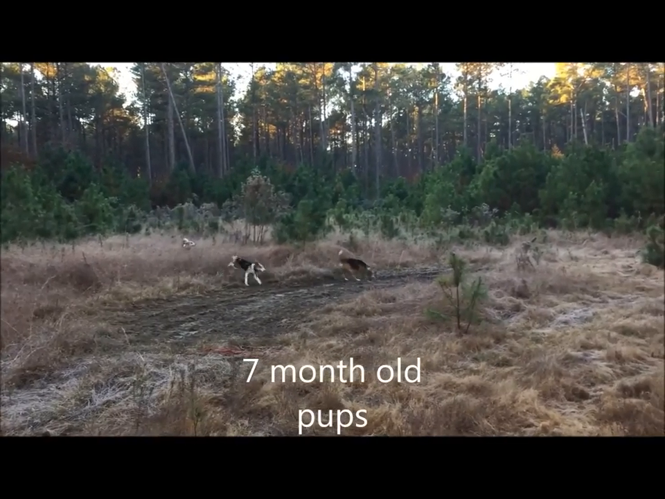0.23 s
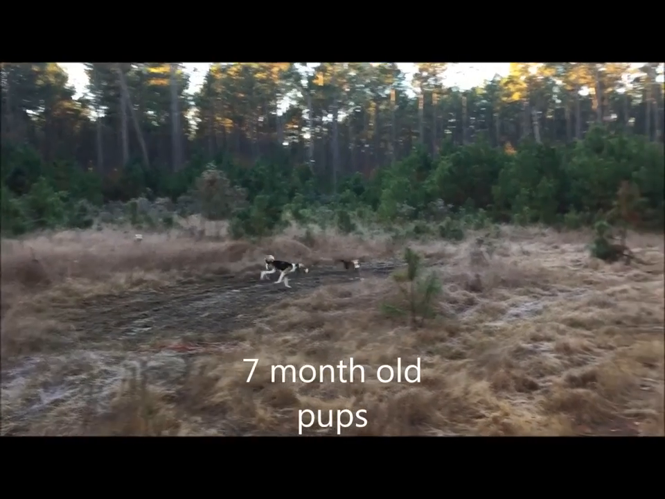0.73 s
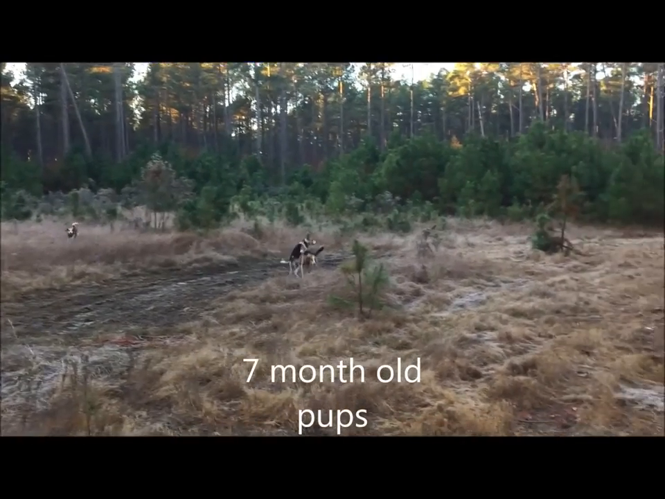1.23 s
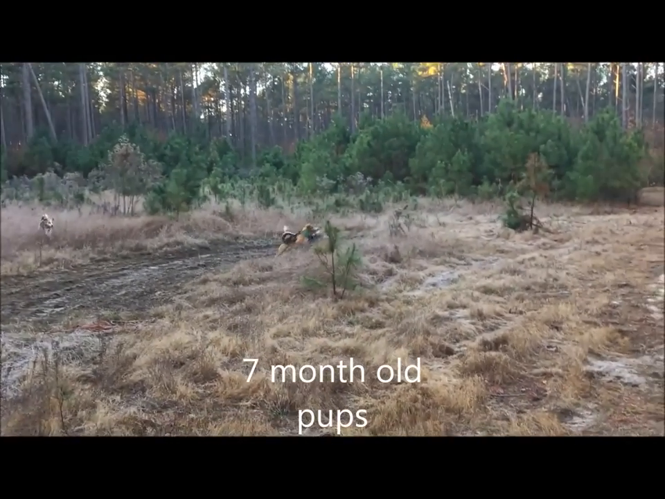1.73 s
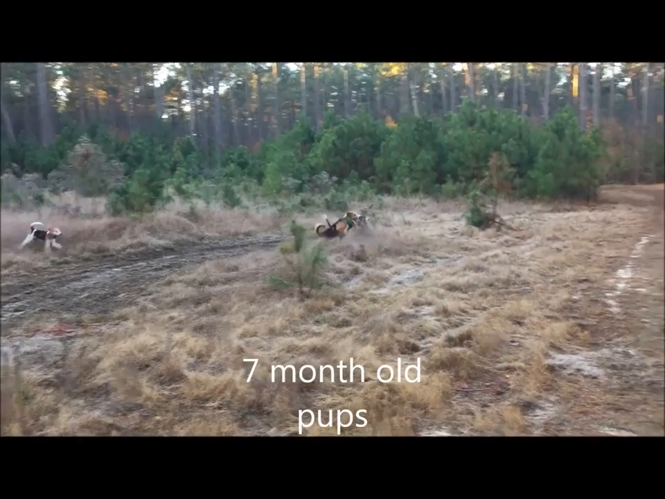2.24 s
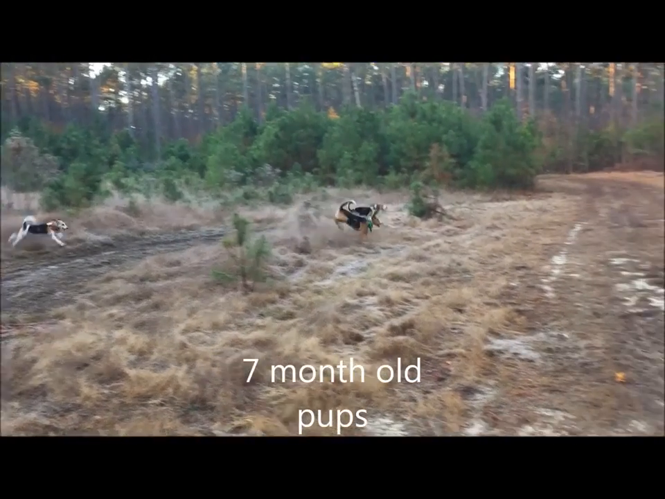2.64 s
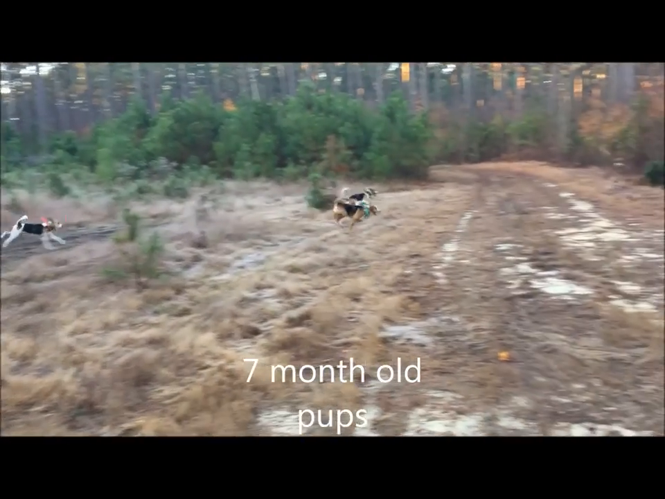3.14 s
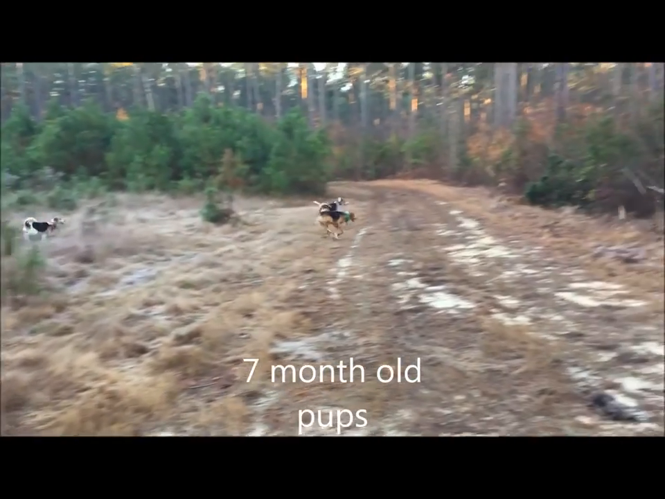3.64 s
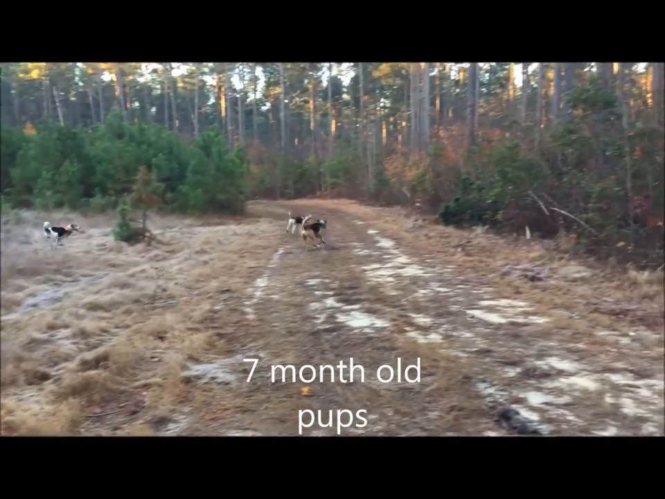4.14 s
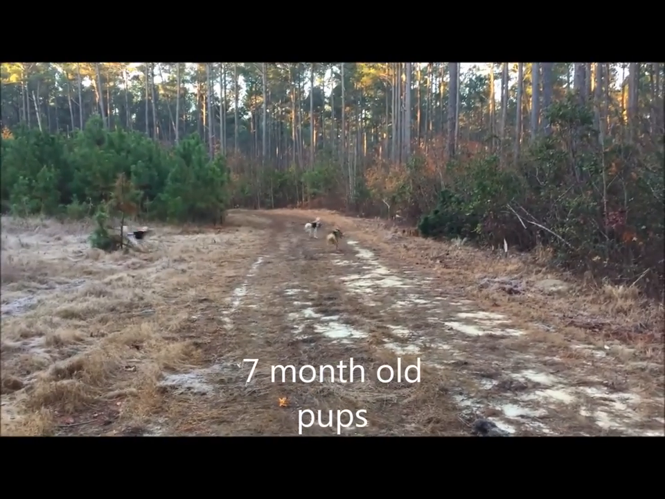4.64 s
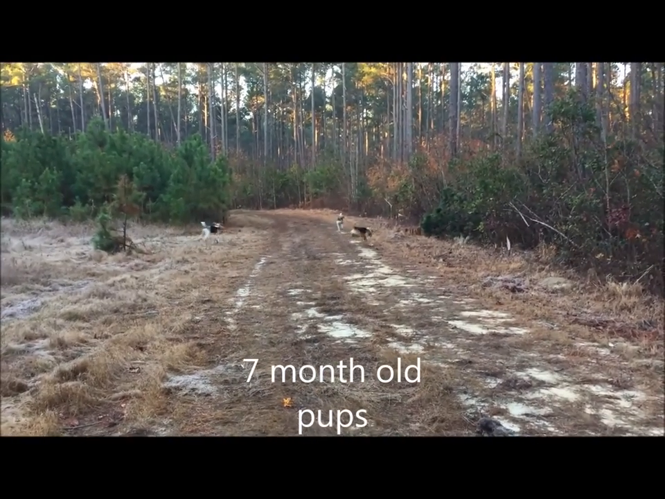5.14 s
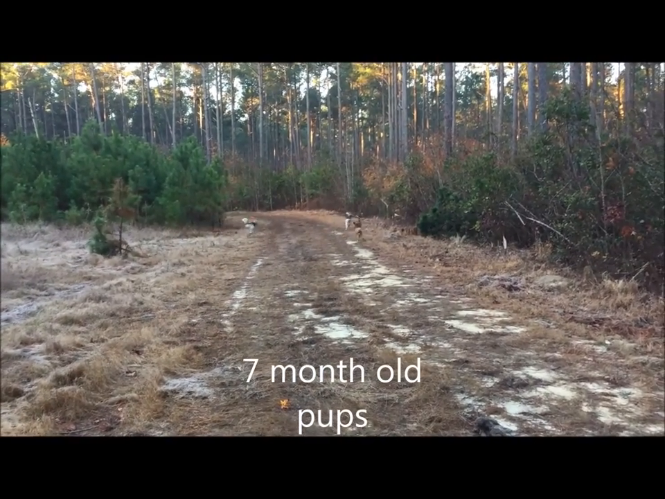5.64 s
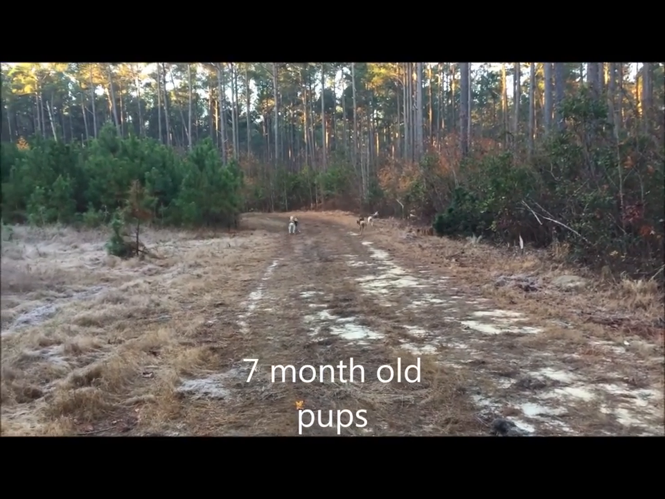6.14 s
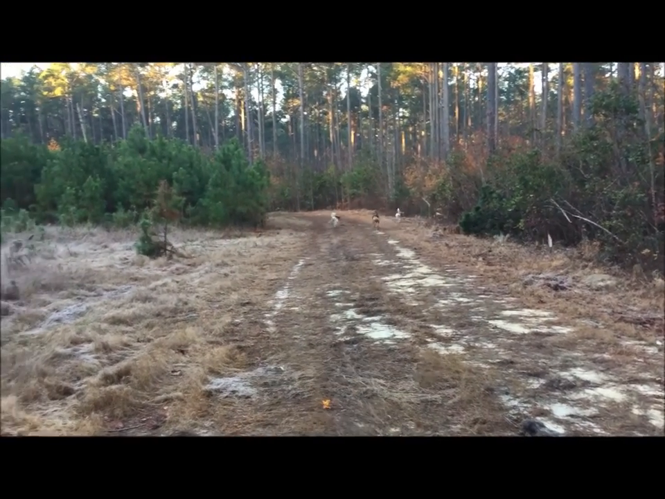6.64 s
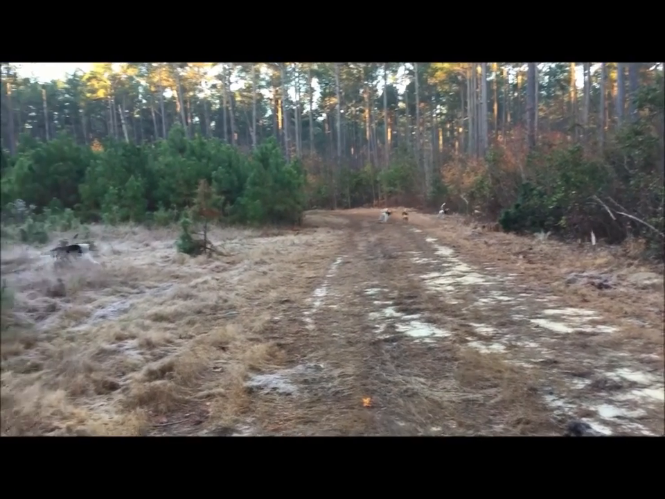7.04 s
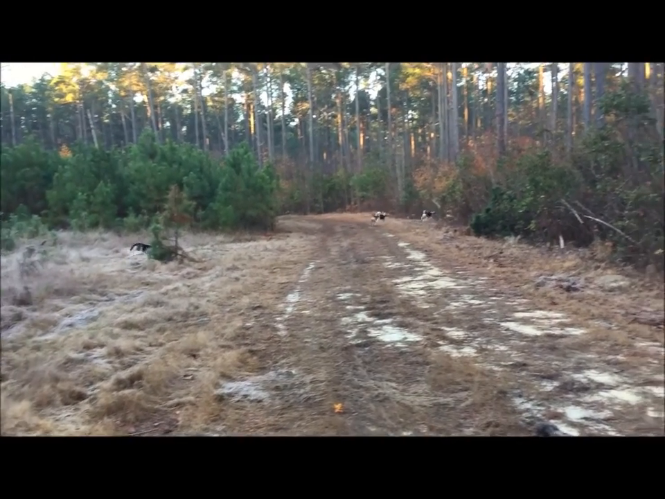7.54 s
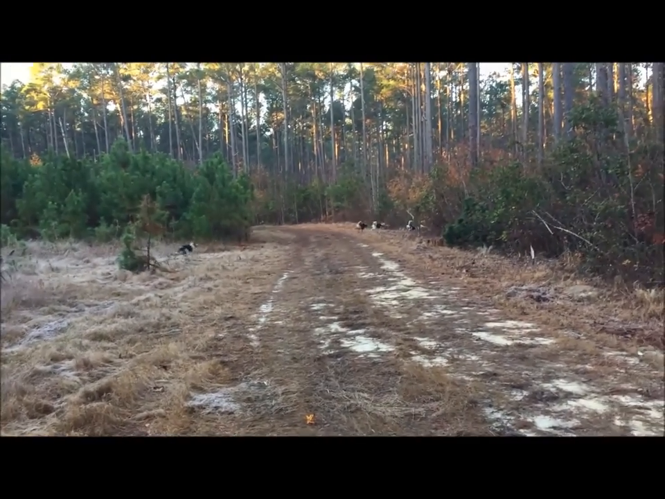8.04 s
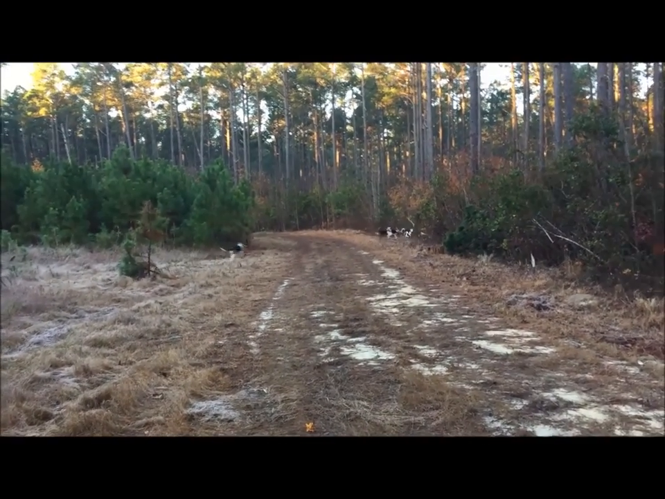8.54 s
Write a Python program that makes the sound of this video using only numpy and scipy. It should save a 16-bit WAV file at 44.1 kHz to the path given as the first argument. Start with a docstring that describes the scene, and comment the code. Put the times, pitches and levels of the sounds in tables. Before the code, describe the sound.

A microphone in the open picks up a pack of running hounds at some distance. Four separate yelps come first, with thin high whistles and a crisp twig crack close by. Their echo hangs through a pause, then calls resume, crowding into a cracked, raspy chorus in the middle before easing to regular single yelps with low rough growls. Quiet low rumble, soft air and dry grass lie underneath.

```python
"""High arched yelps that crack and turn hoarse: young hounds bay as they run a trail through pine woods.
The trunks throw back a long ringing tail. Between the bays: thin whistles, twig snaps, dry grass, a low rumble.
Voices are wavering tones with overtones, roughened and mixed with breath noise; whistles are gliding sines.
Snaps, grass, air and drone are shaped noise; bushes and trees answer by convolution with decaying noise."""
import sys
import numpy as np
from scipy import signal
from scipy.fft import rfft, irfft
from scipy.io import wavfile
from scipy.ndimage import uniform_filter1d

SR = 44100
rng = np.random.default_rng(int(sys.argv[2]) if len(sys.argv) > 2 else 0)


def wrap_up_sound(samples):
    """Save the sound to the file named by the first command line argument, as 16-bit audio."""
    columns = np.atleast_2d(samples).T
    # keep every value between -1 and 1, then stretch to whole-number steps
    tamed = np.clip(columns, -1, 1)
    steps = np.round(tamed * 32767).astype(np.int16)
    wavfile.write(sys.argv[1], SR, steps)


N = 387198
TIME = np.arange(N) / SR


def from_db(db):
    """Decibels to gain."""
    return 10 ** (np.asarray(db) / 20)


def rms_one(x):
    """Scale to unit power."""
    return x / np.sqrt(np.mean(x ** 2) + 1e-20)


def at_hz(points, hz):
    """Read a spectrum on a log-frequency axis."""
    f, value = np.transpose(points)
    return np.interp(np.log(np.maximum(hz, 1)), np.log(f), value)


def coloured(spectrum, size):
    """Noise of a given spectrum, rms 1."""
    hz = np.arange(size // 2 + 1) * SR / size
    white = rfft(rng.standard_normal(size))
    return rms_one(irfft(white * from_db(at_hz(spectrum, hz)), size))


def wobble(rate_hz, size):
    """Smooth random drift up to rate_hz, about unit rms."""
    run_in = SR // 8
    lowpass = signal.butter(4, rate_hz, fs=SR, output="sos")
    drift = signal.sosfilt(lowpass, rng.standard_normal(size + run_in))
    return rms_one(drift)[run_in:]


def resonance(x, hz, width_hz):
    """Two-pole resonance with gain 1 on top."""
    r = np.exp(-np.pi * width_hz / SR)
    feedback = [1, -2 * r * np.cos(2 * np.pi * hz / SR), r * r]
    return signal.lfilter(np.array([1, 0, -1]) * (1 - r * r) / 2, feedback, x)


def note(start_s, length_s, edge_s):
    """Samples a call covers, their time since its start, and its soft-edged gate."""
    inside = np.minimum(TIME - start_s, start_s + length_s - TIME) / edge_s + .5
    at = np.flatnonzero(inside > 0)
    gate = np.sin(np.pi / 2 * np.minimum(inside[at], 1)) ** 2
    return at, np.clip(TIME[at] - start_s, 0, length_s), gate


# still-air spectrum: (f/Hz, relative level/dB)
AIR = [(25, -21), (50, -3), (80, 6.5), (180, -1), (300, -13.5), (700, -14.5), (2000, -19.5), (5000, -26.5),
       (15500, -38)]


def still_air(level_db=-59.0):
    """Noise falling off toward the treble, its level drifting slightly."""
    return from_db(level_db + 2.2 * wobble(11, N)) * coloured(AIR, N)


def far_drone(level_db=-65):
    """Far wavering drone: noise through two equal low resonances."""
    hum = rms_one(resonance(resonance(rng.standard_normal(N), 81.6, 21), 81.6, 21))
    return from_db(level_db + 0.95 * wobble(8, N)) * hum


# grass spectrum: (f/Hz, relative level/dB)
GRASS_COLOUR = [(1500, 0), (3000, -3.5), (7000, -3), (10000, -5), (15000, -5)]
# dry grass stirring close by: (middle t/s, half-width t/s, peak level/dB)
RUSTLES = [(0.12, 0.14, -61.5), (0.325, 0.048, -64.5), (1.394, 4, -71), (2.254, 0.36, -64),
           (2.841, 0.24, -71), (4.79, 0.13, -64.5), (5.843, 0.037, -61), (8.173, 0.04, -61.5)]
GRASS_REST_DB = -83   # never quite still


def grass():
    """Crisp noise; bell-shaped rustles add in power over a resting level."""
    power = from_db(GRASS_REST_DB) ** 2
    for s, half_width_s, level_db in RUSTLES:
        power = power + (from_db(level_db) * np.exp(-2 * ((TIME - s) / half_width_s) ** 2)) ** 2
    return np.sqrt(power) * from_db(0.97 * wobble(70, N)) * coloured(GRASS_COLOUR, N)


# twig snaps: (t/s, level/dB, ring f/Hz)
SNAPS = [(0.565, -58, 6000), (1.202, -57, 4990), (1.221, -48, 4730), (1.236, -27, 6080), (1.27, -50, 3470),
         (1.313, -36, 5100), (1.326, -44, 4000), (1.44, -55, 4470), (2.744, -56, 3245)]


def twig(crack_s=0.0024, splinter_db=-24, splinter_s=0.03):
    """Each snap is a very short bright burst with a splintering tail."""
    out, t = np.zeros(N), TIME[:SR // 10]
    envelope = np.exp(-(t / crack_s) ** 2) + from_db(splinter_db) * np.exp(-t / splinter_s)
    for s, level_db, hz in SNAPS:
        burst = rms_one(resonance(rng.standard_normal(len(t)), hz, 1200))
        at = round(s * SR)
        out[at:at + len(t)] += from_db(level_db) * burst * envelope
    return out


# whistles: (t/s, length t/s, first f/Hz, last f/Hz, level/dB); pitches before the warble
WHISTLES = [(0.315, 0.027, 6100, 6400, -62), (0.53, 0.039, 9150, 8450, -65.5),
            (0.58, 0.081, 8600, 8700, -73), (0.7, 0.028, 8850, 8750, -69), (0.595, .18, 4330, 4550, -53.5),
            (1.739, 0.029, 6310, 6700, -55.5), (5.031, 0.018, 9580, 9890, -57),
            (6.124, 0.055, 9200, 9300, -71), (6.483, 0.034, 5800, 5720, -57),
            (6.487, 0.04, 9520, 9540, -75), (6.71, 0.029, 10440, 10100, -72),
            (6.843, 0.024, 9970, 10020, -69.5)]
WARBLE_RATE_HZ, WARBLE_DEPTH_HZ = 7.9, 120


def whistling(octave_db=-40.0):
    """Thin gliding, warbling tones with a faint octave."""
    out = np.zeros(N)
    for s, length_s, first_hz, last_hz, level_db in WHISTLES:
        at, t, gate = note(s, length_s, edge_s=0.012)
        glide_hz = first_hz + (last_hz - first_hz) * t / length_s
        pitch_hz = glide_hz - WARBLE_DEPTH_HZ * np.cos(2 * np.pi * WARBLE_RATE_HZ * t)
        phase = 2 * np.pi * np.cumsum(pitch_hz * (1 + 0.0016 * wobble(150, len(at)))) / SR
        octave = from_db(octave_db) * np.sin(2 * phase) * (pitch_hz < SR / 8)
        out[at] += gate * from_db(level_db) * np.sqrt(2) * (np.sin(phase) + octave)
    return out


# decay of the woods: (f/Hz, 60 dB decay t/s)
WOODS_T60 = [(1300, 5), (1800, 1), (2600, 3), (3800, 0.66), (9000, 3)]


def lingering(level_db=-51):
    """The woods still ring from an earlier bay: resonant noise dying away."""
    ringing = resonance(resonance(rng.standard_normal(N), 1420, 220), 1420, 220)
    return from_db(level_db - 60 * TIME / WOODS_T60[0][1]) * rms_one(ringing)


# colour of the woods' answer: (f/Hz, level/dB)
WOODS_COLOUR = [(400, -18.5), (650, -6.5), (1000, -10), (1300, -7), (1600, -3), (2000, -0.5), (2550, -2.5),
                (3100, -3.5), (4200, -0.5), (7000, -6)]


def woods(x, edge_s=0.024, early_db=4, early_s=0.064, clump_db=2.5, patchy_db=3):
    """Countless trunks scatter the sound: near ones answer strongly, far ones linger; decay varies by band."""
    t = TIME[:3 * SR]
    white, tail = rng.standard_normal((2, len(t))), 0
    edges_hz = 300 * 2 ** (np.arange(12) / 2)
    for k, (low, high) in enumerate(zip(edges_hz, edges_hz[1:])):
        hz = np.sqrt(low * high)
        bandpass = signal.butter(2, [low, high], "band", fs=SR, output="sos")
        band = signal.sosfilt(bandpass, white[k % 2])
        decay_db = -60 * t / at_hz(WOODS_T60, hz)
        tail = tail + band * from_db(at_hz(WOODS_COLOUR, hz) + decay_db + patchy_db * wobble(14, len(t)))
    tail *= from_db(clump_db * wobble(28, len(t)))   # trunks stand in clumps: the answer flutters
    arrival = 1 - np.exp(-(t / edge_s) ** 4)   # sound first crosses the clearing
    tail *= arrival * (1 + from_db(early_db) * np.exp(-t / early_s))
    return signal.fftconvolve(x, tail * np.sqrt(2 / SR))[:N]


def thicket(x, level_db=-11, fade_s=0.02):
    """Ground and bushes beside the dogs scatter each call so soon that it beats with itself."""
    t = TIME[:SR // 5]
    scatter = rng.standard_normal(len(t)) * np.exp(-t / fade_s) * np.sqrt(2 / (fade_s * SR))
    # twigs turn back mainly short waves
    scatter = signal.sosfilt(signal.butter(1, 1500, "high", fs=SR, output="sos"), scatter)
    return from_db(level_db) * signal.fftconvolve(x, scatter)[:N]


# throat colour of overtones 3-8: (f/Hz, level/dB)
THROAT = [(2400, -0.5), (2900, -4.5), (3250, -10), (3700, -16.5), (4350, -20.5), (5000, -29.5),
          (5900, -23.5), (7200, -32), (8600, -33), (10500, -52)]
# rasp of air in the throat: (f/Hz, relative level/dB)
RASP = [(350, -55.5), (600, -26), (1300, 1), (1750, 6.5), (2400, 2), (3000, -20), (3900, -5.5), (4600, -18),
        (6200, -16), (8500, -24.5), (11000, -44.5)]
OVERTONE_ROUGHNESS = 0.3   # added per overtone above the octave
OCTAVE_FLUTTER_DB, OVERTONE_FLUTTER_DB = 3, 4.5   # rms
BLUR_HZ, HOARSE_BLUR_HZ = 100, 313   # hoarser calls spread their lines wider
GRIT_DB, GRIT_HZ = 5.5, 120   # a hoarse voice comes in uneven jolts
GLIDE_DULL_DB_PER_OCTAVE, FAST_GLIDE_OCTAVES_PER_S = 12, 14
SLACK_DULL_DB_PER_OCTAVE = 18.0


def bay(pitch_hz, level_db, octave_db, hoarse, bite_db, waver=0.0068, rasp_db=-14, slack_rasp_db=7):
    """Vocal folds give a near-pure tone with overtones; when hoarse they beat unevenly and air rasps through."""
    size, hoarse = len(pitch_hz), np.clip(hoarse, 0, 1)
    blur_hz = BLUR_HZ + HOARSE_BLUR_HZ * hoarse.max() ** 2
    # the pitch never holds quite still
    phase = 2 * np.pi * np.cumsum(pitch_hz * (1 + waver * wobble(100, size))) / SR

    def partial(k):
        """Uneven cycles spread a line into a rough band of the same power."""
        chaos = np.clip(1.7 * hoarse + OVERTONE_ROUGHNESS * max(k - 2, 0), 0, 1) ** 3.0
        band = wobble(blur_hz, size) * np.cos(k * phase) + wobble(blur_hz, size) * np.sin(k * phase)
        slip = 0.079 * (k - 1) * wobble(75, size)   # higher overtones are less steady
        return np.sqrt(2 - 2 * chaos ** 2) * np.sin(k * phase + slip) + chaos * band

    voice = from_db(level_db) * partial(1)
    voice += from_db(octave_db + OCTAVE_FLUTTER_DB * wobble(42, size)) * partial(2)

    slack = np.clip(2 - pitch_hz / 620, 0, 1)   # slack folds give few overtones
    speed = uniform_filter1d(np.gradient(np.log2(pitch_hz)) * SR, size=400)   # octaves/s
    sliding = np.minimum(np.abs(speed) / FAST_GLIDE_OCTAVES_PER_S, 1)   # fast slides dull the top
    dulling_db = SLACK_DULL_DB_PER_OCTAVE * slack + GLIDE_DULL_DB_PER_OCTAVE * sliding
    for k in range(3, 9):
        overtone_db = octave_db + bite_db + at_hz(THROAT, k * pitch_hz) - dulling_db * np.log2(k / 2)
        voice += from_db(overtone_db + OVERTONE_FLUTTER_DB * wobble(40, size)) * partial(k)

    # on low notes strong and weak cycles alternate: a growl with lines between the harmonics
    for k in (0.5, 1.5, 2.5):
        half_db = level_db + at_hz(RASP, k * pitch_hz) / 2 - 5 * np.log2(2 * k)
        voice += from_db(half_db) * hoarse * np.minimum(2 * slack, 1) * partial(k)

    # slack folds leak more air
    breath = from_db(rasp_db + slack_rasp_db * slack) * hoarse
    breath = breath * (from_db(octave_db) + hoarse * from_db(level_db))
    rasp = breath * coloured(RASP, size) * (1 + .5 * np.sin(phase))
    jolts = from_db(GRIT_DB * hoarse * (wobble(GRIT_HZ, size) - .5 * hoarse))
    return jolts * (voice + rasp)


# short low growls: (t/s, length t/s, f/Hz, level/dB, octave re fundamental level/dB, hoarseness 0-1)
GROWLS = [(0.138, 0.057, 768.6, -52.5, -2.5, 0.43), (6.203, 0.22, 726, -50.5, -3, 0.42),
          (6.597, 0.072, 490.5, -45.5, -3, 0.38), (6.981, 0.062, 704, -42.5, -31, 0.48),
          (7.422, 0.074, 567.6, -48.5, -12, 0.43), (7.809, 0.064, 561.3, -42.5, -15.5, 0.41),
          (8.616, 0.04, 654, -47.5, -15, 0.44)]
GROWL_BITE_DB, GROWL_CARRY_DB = 7, 8


def growl(row):
    """The same voice held low and rough, with soft edges."""
    s, length_s, hz, level_db, overtone_db, hoarse = row
    at, t, gate = note(s, length_s, edge_s=0.012)
    pitch_hz = np.full(len(t), float(hz))
    sound = bay(pitch_hz, level_db, level_db + overtone_db, hoarse, GROWL_BITE_DB)
    return at, gate * sound, GROWL_CARRY_DB


# open mouth colours the octave overtone as it glides through: (f/Hz, level/dB)
MOUTH = [(1000, -5), (1270, -5), (1600, -5), (2000, -4), (2300, -1.5), (3000, 0.5), (3300, -18.5),
         (3600, -29.5)]
# yelps: (t/s, length t/s, mid-call f/Hz, glide/octaves per s, scoop/octaves, rise t/s, fall/octaves,
# level/dB, swell/dB, fade/dB, octave re fundamental level/dB, hoarseness 0-1,
# bite = top overtone level/dB, carry = level into the trees/dB)
YELPS = [ (0.312, 0.14, 1353, 0.65, 0.67, 0.044, 1.18, -22, 19.5, 12, -15.5, 0.2, -3.5, 0),
         (0.717, 0.14, 1094, 2, 0.45, 0.037, 1.08, -23, 16.5, 16, -6, 0.11, -3.5, -2),
         (1.114, 0.13, 1225, 0.5, 0.55, 0.059, 1.05, -33, 4, 1, -7.5, 0.32, 1, 2),
         (1.743, 0.15, 1299, 0.5, 0.68, 0.049, 1.03, -25, 1, 4, -8, 0.1, -1, -1.5),
         (3.292, 0.14, 1267, 0.46, 0.33, 0.051, 1.5, -34, 11, 21.5, -9.5, 0.3, -3.5, 3),
         (3.593, .15, 1155, -1, 0.45, 0.037, 0.87, -27, 18.5, 12.5, -13, 0.23, -2, 6),
         (3.915, 0.15, 1092, -0.7, 0.14, .012, 0.77, -29.5, 13.5, 22.5, -9, 0, 3, -0.5),
         (4.391, 0.14, 1236, -0.5, 0.24, 0.044, 1.19, -30.5, 20.5, 16.5, -6.5, 0.04, -5.5, 1),
         (4.777, 0.043, 653, 9, 0.087, 0.025, 0.0048, -33.5, 12, 1.5, 4, 0.22, 7.5, -19),
         (5.737, 0.155, 1134, -1.5, .75, .04, 0.65, -26.5, 8.5, 11.5, -9.5, 0.4, -5.5, 2),
         (6.423, 0.028, 806, -1.5, 0.024, 0.013, 0.09, -14, 16, 12.5, -35, 0.2, -7.5, -10),
         (6.494, 0.1, 1332, -0.06, 0.015, 0.029, 0.23, -34, 19, 9, -6, 0.24, -2.5, 2.5),
         (6.736, .108, 1420, -0.6, .15, 0.03, .17, -16.5, 5, 6, -23.5, 0.12, -3.5, -9),
         (6.927, 0.076, 1081, -1, 0.52, .028, 0.65, -30, 16, 4, -23, 0.33, 13, 6),
         (7.017, 0.092, 968, -3, 0.059, 0.015, 0.63, -32, 18, 13, -36, 0.4, 16, 5),
         (7.36, 0.12, 1083, -2.5, 0.32, 0.03, 0.7, -32.5, 18.5, 6, -10, 0.33, -5, 8),
         (7.761, 0.051, 1065, 0, 0.068, 0.022, .15, -34.5, 22, 6.5, 1, 0.26, -6, -0.5),
         (8.15, 0.18, 1100, 0.5, 0.53, 0.041, 0.61, -33.5, 14, 20, -7, 0.12, -3.5, 6),
         (8.552, .15, 1075, -0.6, 0.56, .025, 0.83, -34.5, 9, 8, -18, 0.41, -0.5, 6), ]
FALL_S, FALL_CURVE = 0.039, 1.5   # closing drop starts gently and steepens
FALL_HOARSENESS = 0.4   # approached as the pitch drops
OVERTONE_FOLLOWS = 0.29   # share of the effort in dB that the overtones take part in
CREST_SHARE, BUILD_DB_PER_S, EASE_DB_PER_S = 0.23, 71.5, 49   # effort builds to a crest, then eases
TREMOR_HZ, TREMOR_DB, TREMOR_OCTAVES = 35, 2.04, 0.0085   # a running dog's voice shakes; rms depths
SCOOP_DULL_DB = 12.5   # top overtones open only once the pitch is reached
# the drop ends in a short low "oo" as it passes a throat resonance
LANDING_DB, LANDING_HZ, LANDING_OCTAVES = 5, 650, 0.18


def yelp(row):
    """Scoops up while swelling, glides, then falls as breath gives out; effort drives level and overtones."""
    (s, length_s, hz, glide, scoop, rise_s, fall, peak_db, swell_db, fade_db,
     overtone_db, hoarse, bite_db, carry_db) = row
    at, t, gate = note(s, length_s, edge_s=.006)
    rising = np.cos(np.pi / 2 * np.minimum(t / rise_s, 1)) ** 2
    falling = np.maximum(1 - (length_s - t) / FALL_S, 0) ** FALL_CURVE

    held_hz = hz * 2 ** (glide * (t - length_s / 2))
    pitch_hz = held_hz * 2 ** (TREMOR_OCTAVES * wobble(TREMOR_HZ, len(t)) - scoop * rising - fall * falling)

    crest_s = CREST_SHARE * length_s
    effort_db = -swell_db * rising - fade_db * falling
    effort_db += np.minimum(BUILD_DB_PER_S * (t - crest_s), EASE_DB_PER_S * (crest_s - t))
    effort_db += TREMOR_DB * wobble(TREMOR_HZ, len(t))

    hoarse = hoarse + (FALL_HOARSENESS - hoarse) * np.clip(2 * fall * falling, 0, 1)
    octave_db = peak_db + overtone_db + OVERTONE_FOLLOWS * effort_db + at_hz(MOUTH, 2 * pitch_hz)
    landing_db = LANDING_DB * falling * np.exp(-(np.log2(pitch_hz / LANDING_HZ) / LANDING_OCTAVES) ** 2)
    level_db = peak_db + effort_db + landing_db
    sound = bay(pitch_hz, level_db, octave_db, hoarse, bite_db - SCOOP_DULL_DB * rising)
    return at, gate * sound, carry_db


# loudest bays, several dogs overlapping: (bite level/dB, carry level/dB, course of the voice
# [(t/s, f/Hz, level/dB, octave re fundamental level/dB, hoarseness 0-1), ..])
CRACKED_BAYS = [ (-10, -2.5, [(4.812, 707, -41, 7, 0.5), (4.828, 893, -24, -18, 0.4),
                (4.889, 975, -18.5, -14, 0.07), (4.897, 1323, -28.5, -15.5, 0.38),
                (4.95, 1357, -34, -5.5, 0.46), (4.99, 1353, -22.5, -17.5, .36),
                (5.04, 1398, -28, -18.5, 0.38)]), (1, 3, [(5.316, 985, -40.5, 2, 0.08),
                (5.34, 1380, -26.5, -14, 0.17), (5.365, 1460, -25, -5.5, 0.14),
                (5.39, 1700, -34.5, -14.5, 0.37), (5.405, 1666, -29.5, -31.5, .65),
                (5.448, 1530, -23, -28.5, 0.48), (5.465, 900, -27, -26, .35),
                (5.492, 497, -37.5, -19, 0.06)]), (-4.5, -3, [(5.561, 488, -48, -4.5, .1),
                (5.587, 781, -31.5, -10.5, 0.15), (5.6, 927, -16.5, -22.5, 0.29),
                (5.617, 964, -17.5, -18.5, 0.12), (5.623, 1374, -25.5, -25, .15),
                (5.695, 1290, -27.5, -19.5, .2), (5.712, 816, -33, -17.5, .25),
                (5.73, 516, -38, -13, 0.05)]), (5.5, 3, [(5.645, 1440, -26, -3, 0.3),
                (5.665, 1489, -36, -20, 0.3), (5.698, 1496, -32, -10.5, 0.14),
                (5.71, 1656, -40, -4.5, 0.36), (5.78, 1667, -34.5, -28.5, 0.27),
                (5.9, 1692, -37.5, -19.5, 0.5)]), (6, -6.5, [(5.672, 732, -47.5, -8.5, .1),
                (5.69, 1006, -21, -17.5, 0.05), (5.717, 1139, -14, -29, .08),
                (5.723, 1580, -35.5, -14.5, 0.4), (5.75, 1620, -29.5, -20.5, 0.42),
                (5.805, 1149, -34.5, -9.5, 0.6), (5.823, 738, -23.5, -13, 0.38),
                (5.843, 480, -39, -14.5, 0.3)]), (5, -3.5, [(5.97, 1117, -20, -29, .1),
                (5.988, 1430, -20.5, -7, 0.11), (6.005, 1509, -18.5, -12.5, .1),
                (6.036, 1488, -13, -28.5, 0.2), (6.042, 1715, -20.5, -22.5, 0.1),
                (6.06, 1780, -28, -34, .12), (6.09, 1513, -27.5, -18.5, 0.31)]),
                (3.5, -8.5, [(5.981, 532, -42, -7.5, .2), (6.01, 807, -26.5, -25, 0.37),
                (6.06, 937, -23.5, -15, 0.37), (6.068, 889, -25.5, -5.5, 0.4),
                (6.073, 1307, -20.5, -26.5, 0.4), (6.105, 1261, -26, -13.5, 0.45),
                (6.12, 750, -31.5, -20, 0.3), (6.138, 485, -47, -17.5, 0.3)]),
                (-0.5, -7.5, [(6.359, 872, -21.5, -9.5, 0.14), (6.365, 963, -14.5, -19.5, 0.12),
                (6.374, 1323, -19.5, -36.5, 0.2), (6.402, 1382, -16.5, -19, 0.25),
                (6.411, 1628, -21.5, -29.5, 0), (6.453, 1523, -28.5, -28.5, 0.2),
                (6.458, 1259, -14.5, -29, 0.2), (6.485, 1177, -21, -28, 0.03)]),
                (-1.5, -4, [(8.374, 1378, -40, 1.5, 0.25), (8.41, 1463, -26, -5, 0.04),
                (8.44, 1374, -22, -9, 0), (8.464, 1256, -29, -4, 0.25), (8.469, 1640, -33, -34, 0.27),
                (8.51, 1340, -33.5, -11, 0.4), (8.53, 924, -46, 12, 0.15)]), ]


def cracked_bay(row):
    """The voice follows its course through jumps of register, often turning hoarse."""
    bite_db, carry_db, course = row
    s, *controls = np.transpose(course)
    s = np.sort(s)
    at, t, gate = note(s[0], s[-1] - s[0], edge_s=.005)
    pitch_hz, level_db, overtone_db, hoarse = [np.interp(s[0] + t, s, control) for control in controls]
    return at, gate * bay(pitch_hz, level_db, level_db + overtone_db, hoarse, bite_db), carry_db


def hounds():
    """All the calls: as heard directly, and as they carry into the trees."""
    out = np.zeros((2, N))
    calls = [yelp(row) for row in YELPS]
    calls += [cracked_bay(row) for row in CRACKED_BAYS]
    calls += [growl(row) for row in GROWLS]
    for at, sound, carry_db in calls:
        out[:, at] += sound, from_db(carry_db) * sound
    # the pack's calls carry nothing below about 320 Hz
    return signal.sosfilt(signal.butter(4, 320, "high", fs=SR, output="sos"), out)


def scene(whistle_carry_db=-13):
    """Pack and whistles, their answer from bushes and trees, and the small sounds near by."""
    background = still_air() + far_drone() + grass()
    whistles = whistling()
    pack, pack_carried = hounds()
    carried = pack_carried + from_db(whistle_carry_db) * whistles
    echo = thicket(carried) + woods(carried) + lingering()
    return (background + twig() + whistles + echo + pack)[None]


CUTOFF_HZ = 15750


def record(dry):
    """Steep elliptic low-pass cuts the top."""
    return signal.sosfilt(signal.ellip(10, .1, 80, CUTOFF_HZ, fs=SR, output="sos"), dry)


dry = scene()
out = record(dry)
wrap_up_sound(out)
```